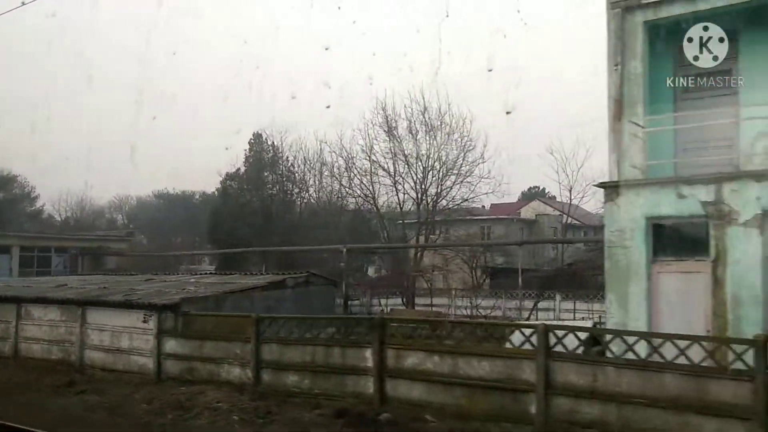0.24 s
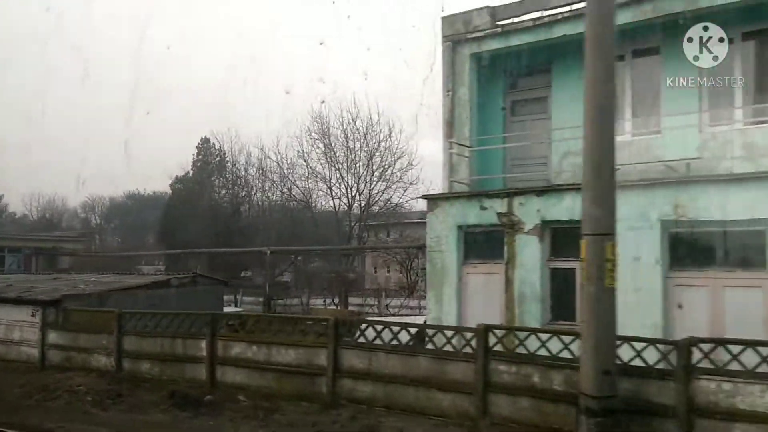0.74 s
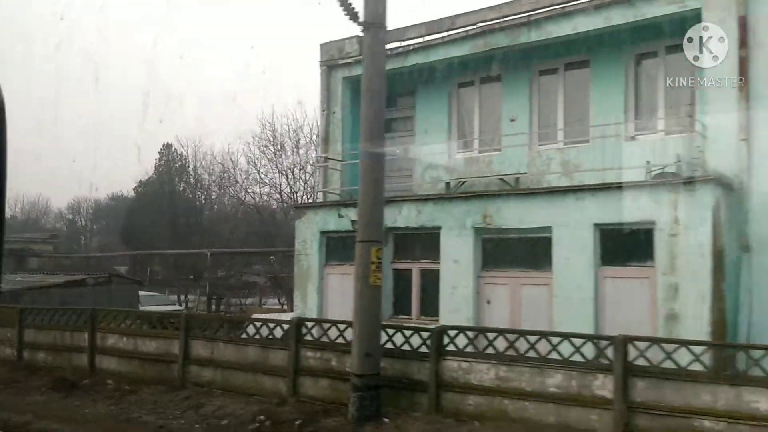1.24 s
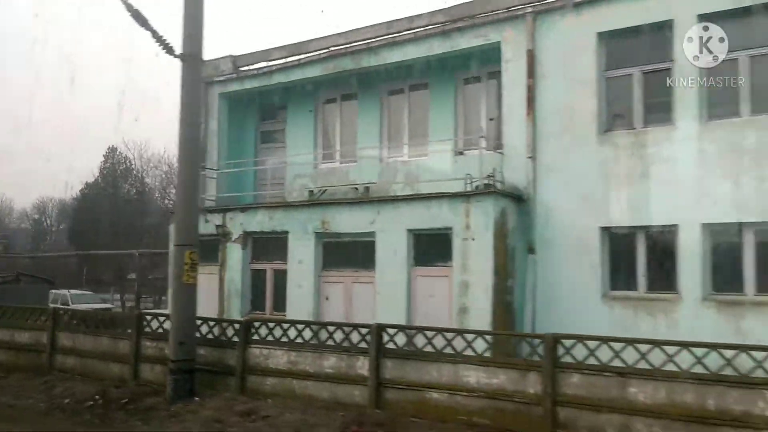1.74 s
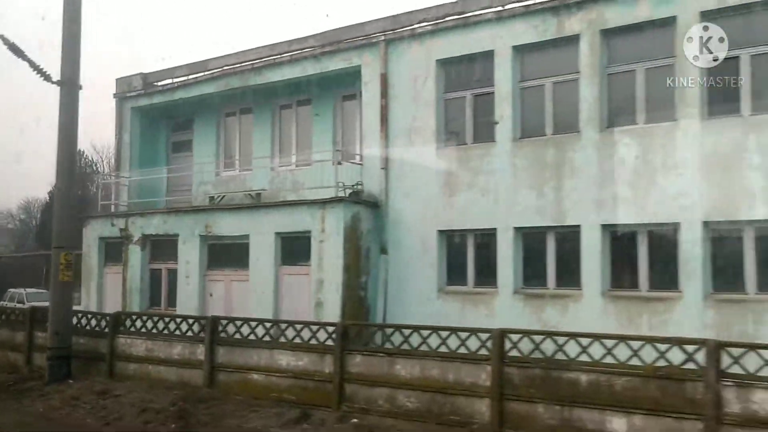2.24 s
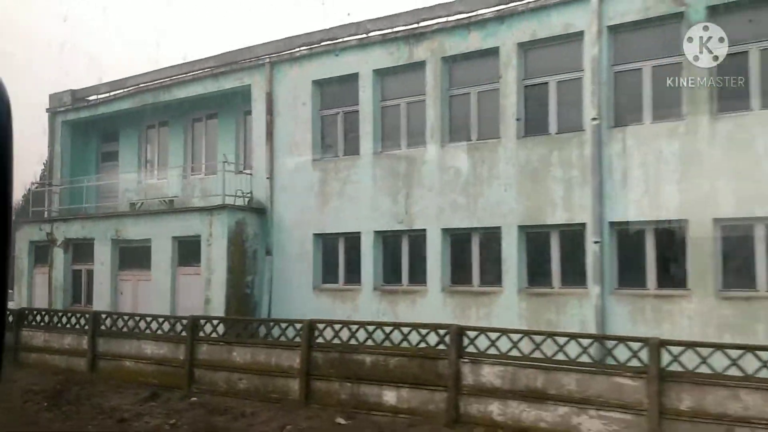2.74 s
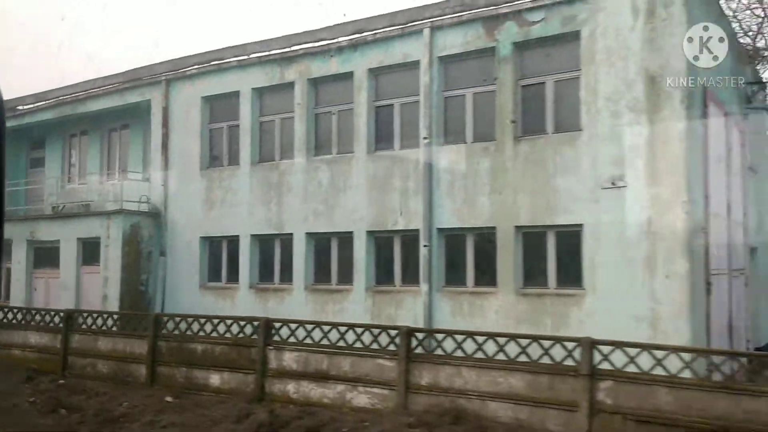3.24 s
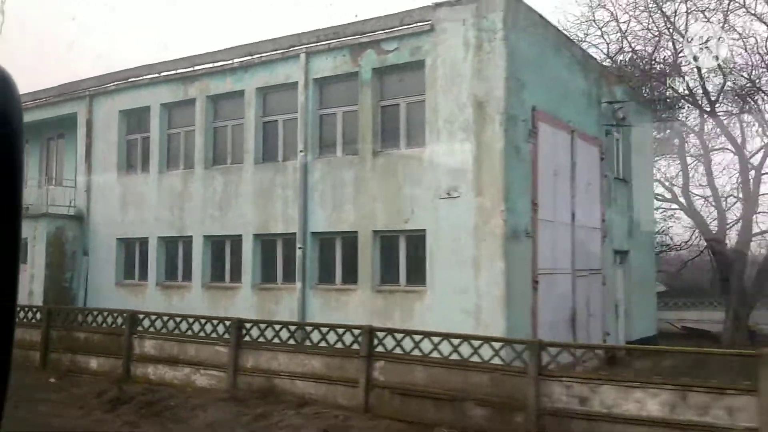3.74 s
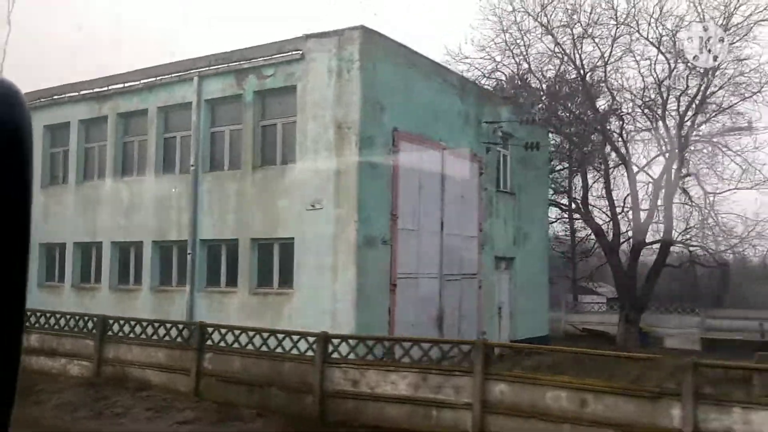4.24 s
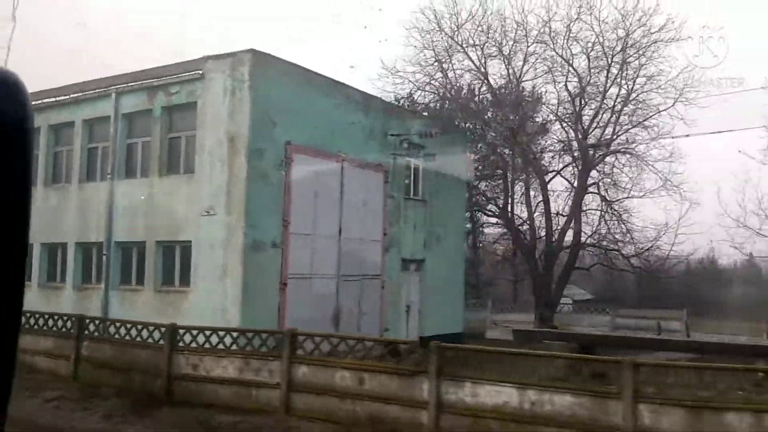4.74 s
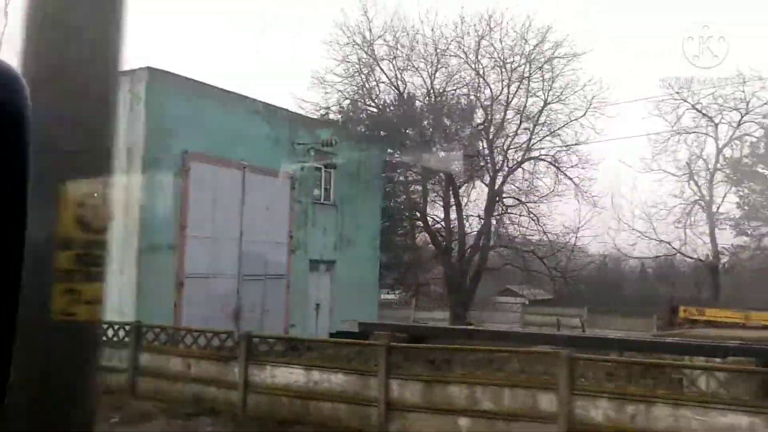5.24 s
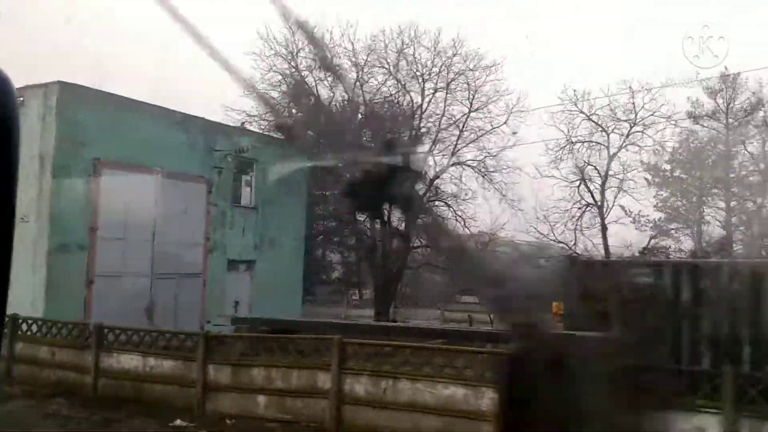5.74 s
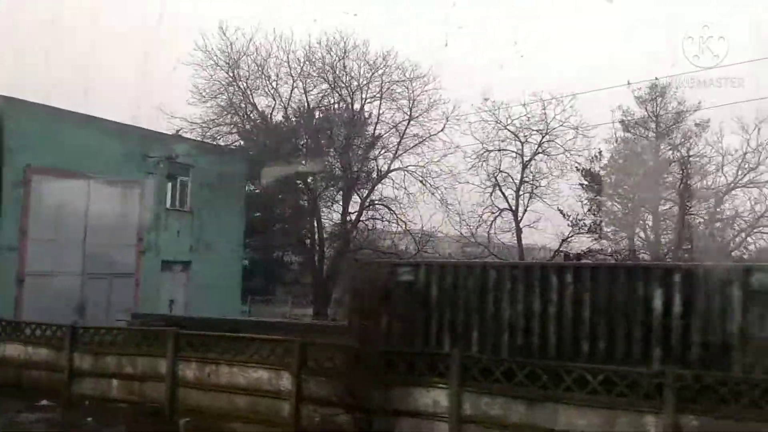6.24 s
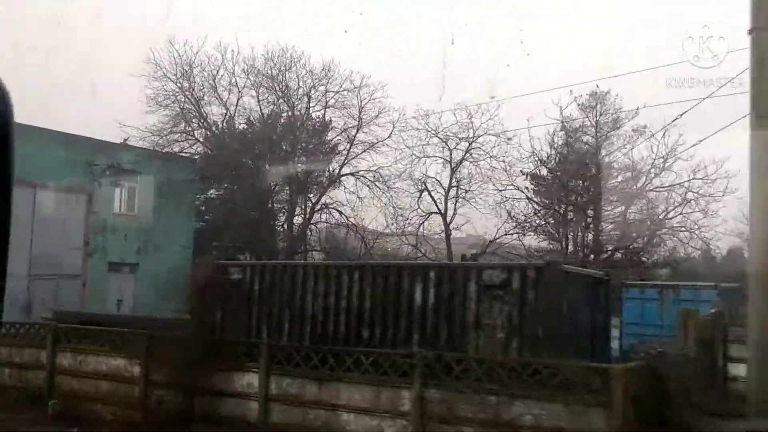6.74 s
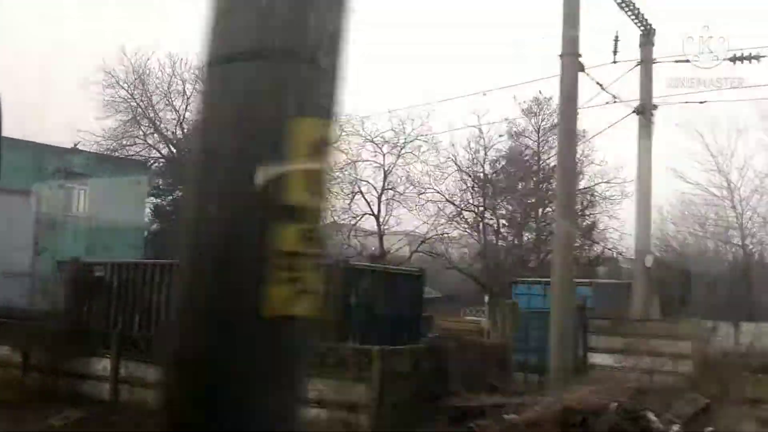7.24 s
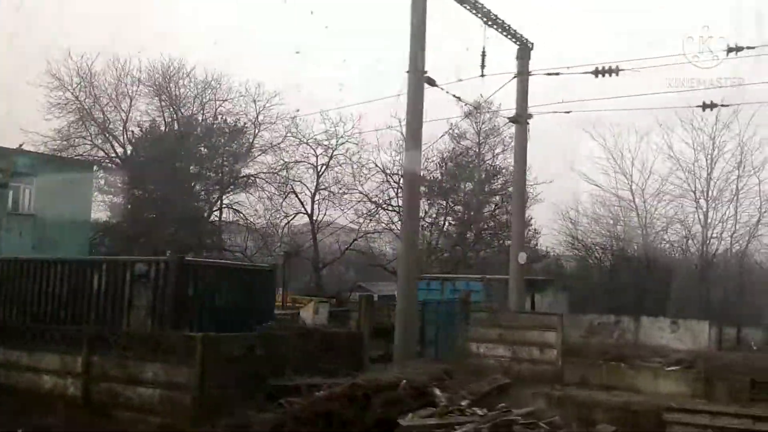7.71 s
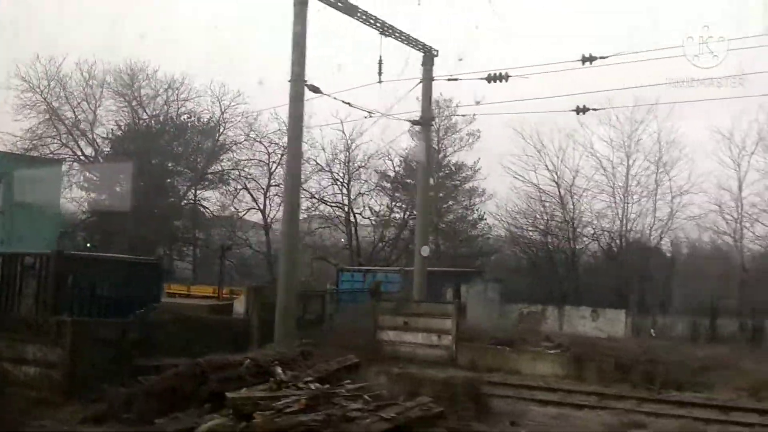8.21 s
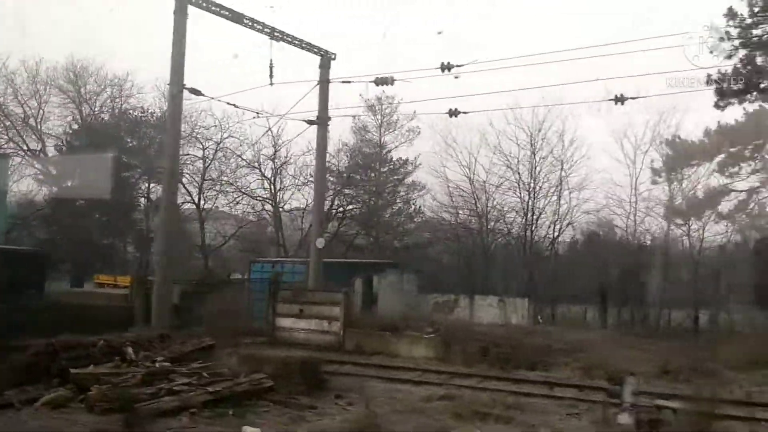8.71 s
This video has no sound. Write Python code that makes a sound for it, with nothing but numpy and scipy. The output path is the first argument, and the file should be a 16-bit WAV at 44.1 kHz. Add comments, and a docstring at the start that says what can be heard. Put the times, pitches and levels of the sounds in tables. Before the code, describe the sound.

Heard from inside a slow passenger carriage, with a phone by the window, a deep wheel rumble runs throughout about nine seconds, dark and muffled, with a swelling floor boom and little top hiss. Irregular rail-joint knocks begin at 0.2 s, with soft thumps at 0.6 and 1.6 s. Firmer blows at 2.4 and 2.8 s ring the floor and panels, and tiny high trim squeaks chirp nearby. A soft rustle passes at 3.3 s. Around 3.9-4.4 s knocks cluster, with a sharp loose-metal clank at 4.24 s. Lighter bumps follow until stronger thuds at 6.6, 7.0 and 7.8 s; a small tick falls at 7.1 s. From 8.2 s blows crowd together over points, with a faint clank at 8.5 s, a bright squeak and a rough gliding squeal from 8.6 to 8.8 s. The rumble continues to the end. Electric whines are barely audible.

```python
"""Wheels of a slow passenger carriage, heard from inside: their roughness, as shaped noise, shakes the floor,
which booms and rumbles, and each rail joint drives the noise harder and rings a panel. Pitched thumps are narrow
noise; trim squeaks, rustles and a clanking fitting are noise bursts and rings; thin electric whines are sines.
Gliding tones squeal over the points at the end. A phone by the window hears it through two ports a hand apart."""
import sys
import numpy as np
from scipy import signal
from scipy.fft import rfft, irfft, next_fast_len
from scipy.io import wavfile
from scipy.ndimage import uniform_filter1d

SR = 44100
rng = np.random.default_rng(int(sys.argv[2]) if len(sys.argv) > 2 else 0)


def generate_wav(sig):
    """Save sig (samples, or channels by samples) to the path in sys.argv[1] as 16-bit PCM at SR."""
    pcm = np.round(np.clip(np.atleast_2d(sig).T, -1, 1) * 32767).astype(np.int16)
    wavfile.write(sys.argv[1], SR, pcm)


N = 395577
TIME = np.arange(N) / SR
MARGIN = 2048  # samples of run-in and run-out for the port filters
SIZE = next_fast_len(N + 2 * MARGIN)
HZ = np.arange(SIZE // 2 + 1) * SR / SIZE + 1e-3  # kept off zero for logs and divisions


def undb(db):
    """dB to gain."""
    return 10 ** (np.asarray(db) / 20)


def over_hz(table, count=1):
    """One column of a spectrum table, read at every frequency along a log axis."""
    columns = np.transpose(table)
    return np.interp(np.log(HZ), np.log(columns[0]), columns[count])


def resonance(hz, width):
    """Gain of one resonance, 1 at its centre."""
    return 1 / np.sqrt(1 + ((HZ - hz ** 2 / HZ) / width) ** 2)


def noise(gain, even=0.):
    """Two unrelated noises of the given colour, rms 1; even > 0 irons out their chance swells."""
    spectrum = rfft(rng.standard_normal((2, SIZE))) * gain
    x = irfft(spectrum, SIZE)
    if even:
        envelope = np.hypot(x, irfft(-1j * spectrum, SIZE))
        x = x / (envelope + 0.072 * x.std()) ** even
    return x[:, :N] / x.std()


def walk(rate):
    """Random levels held 1 / rate s and slewed twice; spread near 1."""
    hold = int(SR / rate)
    steps = np.repeat(rng.standard_normal(N // hold + 1), hold)
    return 1.5 * uniform_filter1d(uniform_filter1d(steps, hold), hold)[:N]


def blow(start_s, rise_s, t60_s):
    """Envelope that swells for rise_s and then dies away, cut one second after its start."""
    envelope, start = np.zeros(N), int(start_s * SR)
    t = TIME[start:start + SR] - TIME[start]
    rise_s = max(rise_s, 1e-3)
    swell = np.sin(np.pi / 2 * np.minimum(t / rise_s, 1)) ** 2
    envelope[start:start + SR] = swell * 1000. ** (-np.maximum(t - rise_s, 0) / t60_s)
    return envelope


def slow(width, even):
    """A pair of noises mostly below width Hz."""
    return noise(resonance(width / 20, width) ** 2, even)


def moved(slip, turn):
    """A pair of slow noises carried up to the pitch whose running phase is turn."""
    return slip[0] * np.cos(turn) + slip[1] * np.sin(turn)


def rings(rows, width, even):
    """Narrow noise moved to the pitch of each (start_s, level_db, pitch_hz, rise_s, t60_s), shaped as a blow."""
    slip, out = slow(width, even), np.zeros(N)
    for start_s, level_db, pitch_hz, rise_s, t60_s in rows:
        at = slice(int(start_s * SR), int(start_s * SR) + SR)
        tone = moved(slip[:, at], 2 * np.pi * pitch_hz * TIME[at])
        out[at] += undb(level_db) * blow(start_s, rise_s, t60_s)[at] * tone
    return out


def bursts(events, colour):
    """Rough contact heard through a few resonances."""
    envelope = sum(undb(level_db) * blow(start_s, rise_s, t60_s) for start_s, level_db, rise_s, t60_s in events)
    gain = sum(undb(gain_db) * resonance(hz, width) ** 2 / np.sqrt(width) for hz, width, gain_db in colour)
    return envelope * noise(gain)


# Levels below are relative ones; scene() sets the mix.
# edges of the nine bands in which the carriage moves on its own: edge_hz
BAND_EDGES = [20, 82, 117, 250, 600, 1300, 2300, 4400, 7200, 20000]
# colour of floor and walls: hz, gain_db (per Hz)
SHELL_COLOUR = [(25, -31.5), (42, -10.5), (55, 1), (76, -8.5), (115, -1.5), (160, 1), (230, -7.5),
                (370, -17), (560, -18), (760, -25.5), (1250, -34), (1650, -33.5), (3700, -43.5),
                (7200, -68), (9300, -72.5), (15000, -72)]
# panel resonances above the shell: hz, width_hz (before sharpening), gain_db
PANEL_RESONANCES = [(96.36, 11, 9), (198, 3.8, 1.5), (296, 15, 5), (309, 18.5, 5), (423.7, 23, 6),
                    (581.4, 13, 6), (668, 4.6, 7.5), (1032.7, 22, 8.5), (1250, 25, 8), (3780, 7.2, 8)]
# low body motion: time_s, sway_db, rumble_db
BODY_MOTION = [(0.0, -35, -36.5), (0.1, -44, -40), (0.37, -35, -34.5), (0.4, -43.5, -36),
               (0.52, -40, -36.5), (2.37, -45, -36), (2.47, -38, -32.5), (2.77, -46.5, -36),
               (2.95, -32.5, -38.5), (3.0, -48.5, -37.5), (3.05, -36.5, -35), (3.35, -43, -35.5),
               (4.1, -36, -38), (4.22, -48, -35), (4.27, -33, -36.5), (4.42, -44.5, -33.5),
               (5.9, -39, -34.5), (5.92, -52.5, -34), (6.05, -39, -39.5), (6.54, -41.5, -35),
               (6.59, -35.5, -33.5), (7.74, -44.5, -37), (7.79, -35.5, -34.5), (8.19, -48.5, -36),
               (8.25, -36, -36.5), (8.37, -51.5, -36), (8.52, -29, -33), (8.57, -41.5, -37),
               (8.89, -37, -36.5), (8.97, -49, -36)]
# surges of the floor boom: time_s, level_db
FLOOR_BOOM = [(0.0, -43), (0.32, -38), (0.4, -44.5), (0.62, -35.5), (0.67, -50), (1.0, -36.5), (1.05, -50),
              (1.1, -41.5), (1.32, -55), (1.6, -33), (1.82, -55), (1.92, -27), (2.02, -43), (2.22, -39),
              (2.32, -55), (2.4, -32), (2.72, -42), (3.0, -28), (3.12, -36.5), (3.45, -33), (3.47, -46),
              (3.52, -26), (3.75, -34), (3.8, -30), (4.45, -36), (5.15, -31.5), (5.22, -45), (5.37, -32),
              (5.72, -36.5), (6.49, -37), (6.52, -48.5), (6.62, -35), (6.75, -44), (6.871, -30),
              (6.92, -52), (6.97, -33.5), (7.99, -33.5), (8.02, -43.5), (8.27, -26.5), (8.34, -43.5),
              (8.47, -31), (8.64, -38.5), (8.67, -30.5), (8.97, -40.5)]
# steady rolling: time_s, level_db
ROLLING = [(0.0, -40), (0.45, -40.5), (1.07, -40.5), (2.75, -39.5), (3.17, -39), (3.8, -38.5), (3.97, -41),
           (4.19, -38.5), (4.35, -39), (4.57, -38.5), (4.92, -38.5), (5.5, -40), (6.97, -39), (7.45, -39.5),
           (8.27, -39), (8.49, -40), (8.64, -34.5), (8.97, -40.5)]
# top hiss: time_s, level_db
TOP_HISS = [(0.0, -82), (0.42, -79.5), (0.97, -84), (1.92, -80), (2.4, -80.5), (3.42, -79.5), (4.12, -80),
            (5.25, -83.5), (6.67, -81), (8.47, -80.5), (8.69, -74.5), (8.97, -82)]
# wheels over joints and rough spots, before the rail's lead:
# start_s, thud_db, knock_db, clack_db, rattle_db, ring_hz, t60_s (of all but the thud)
RAIL_JOINTS = [(0.201, -37, -38, -47, -54.5, 464, 0.71), (0.599, -40.5, -37, -52.5, -58, 514, 0.24),
               (0.708, -42, -54, -51, -62, 500, .15), (1.212, -49, -54, -47.5, -69, 593, 0.13),
               (1.38, -52, -38.5, -60.5, -65, 592, 0.089), (1.644, -37.5, -35.5, -45, -57, 435, 0.49),
               (1.91, -38.5, -43.5, -55.5, -59, 549, 0.35), (2.19, -33.5, -50.5, -59, -57, 446, 0.12),
               (2.425, -36.5, -31.5, -47, -53.5, 310.3, 0.65), (2.82, -28, -33.5, -50.5, -55, 423, 0.38),
               (2.848, -33, -36.5, -46.5, -59.5, 299, 0.35), (3.544, -30, -38.5, -55.5, -62.5, 580, 0.35),
               (3.791, -52, -41, -53, -66.5, 600, 0.12), (3.947, -37.5, -35, -41, -52.5, 586, 0.35),
               (4.208, -42.5, -35, -43.5, -65, 412, 0.28), (4.333, -31.5, -34, -45, -56, 547, 0.53),
               (4.355, -39, -36.5, -41, -59, 700, 0.25), (4.737, -38.5, -35, -44, -56, 406, 0.46),
               (5.464, -50, -46, -49, -60.5, 560, 0.17), (5.581, -36.5, -48, -55.5, -68, 425, 0.24),
               (5.828, -35.5, -42.5, -41, -60.5, 436, 0.21), (6.071, -40.5, -39, -48.5, -68, 518, 0.52),
               (6.583, -32.5, -34.5, -41.5, -49.5, 425, 0.41), (6.975, -27, -37, -52.5, -55.5, 436, 0.78),
               (7.66, -44, -44, -43, -55.5, 421, 0.28), (7.798, -26.5, -38, -50, -59, 390, 0.7),
               (8.24, -29.5, -37, -48, -62, 492, 0.5), (8.345, -44, -39, -52.5, -62.5, 300, .15),
               (8.425, -31, -36.5, -43.5, -49.5, 450, 0.84), (8.492, -30, -32.5, -39, -49, 447, 0.41),
               (8.552, -38.5, -30.5, -42.5, -56.5, 310.6, 0.16), (8.611, -24.5, -39, -40, -53.5, 573, 0.21),
               (8.824, -29.5, -35.5, -47, -55, 428.5, 0.67), (8.902, -39, -37, -48, -64, 400, 0.25)]
JOINT_LEAD_S, JOINT_RISE_S, THUD_RISE_S, THUD_T60_S = 0.015, 0.026, 0.042, 0.24
JOINT_HISS_DB, JOINT_FIZZ_DB = -7, -19  # the two bands above the rattle follow it
RING_DB, RING_WIDTH_HZ = -8.5, 41  # level against the knock
SURGE_DB, SURGE_PER_S = 1.5, 5.5  # the rumble swells by chance
PEAK_HZ, PEAK_WANDER_HZ, PEAK_WANDER_PER_S = 148.4, 18, 8
PEAK_DB, PEAK_WIDTH_HZ = -5.5, 10.1  # level against the rumble


def carriage():
    """Wheel roughness through shell and panels; joints drive the same bands harder and ring a panel."""
    panels = sum((undb(db) ** 2 - 1) * resonance(hz, width) ** 4 for hz, width, db in PANEL_RESONANCES)
    shell = undb(over_hz(SHELL_COLOUR)) * np.sqrt(1 + panels)
    masks = [1 / np.sqrt((1 + (low / HZ) ** 16) * (1 + (HZ / high) ** 16))
             for low, high in zip(BAND_EDGES, BAND_EDGES[1:])]
    body_s, sway_db, rumble_db = np.transpose(BODY_MOTION)
    boom, roll, hiss = (np.transpose(table) for table in (FLOOR_BOOM, ROLLING, TOP_HISS))
    start_s, thud_db, knock_db, clack_db, rattle_db, ring_hz, t60_s = np.transpose(RAIL_JOINTS)
    start_s = start_s - JOINT_LEAD_S  # the rail carries the blow ahead of the wheel

    # sway, boom and rumble; thuds add their power to the rumble
    thud_shapes = np.array([blow(s, THUD_RISE_S, THUD_T60_S) for s in start_s]) ** 2
    thuds = undb(thud_db) ** 2 @ thud_shapes
    surging_db = np.interp(TIME, body_s, rumble_db) + SURGE_DB * walk(SURGE_PER_S)
    rumble = np.sqrt(undb(surging_db) ** 2 + thuds)
    out = undb(np.interp(TIME, body_s, sway_db)) * noise(shell * masks[0], 0.12)
    out = out + undb(np.interp(TIME, *boom)) * noise(shell * masks[1], 0.37)
    out = out + rumble * noise(shell * masks[2], 0.35)

    # one loose resonance of the floor drifts about inside the rumble
    pitch = PEAK_HZ + PEAK_WANDER_HZ * walk(PEAK_WANDER_PER_S)
    turn, slip = 2 * np.pi * np.cumsum(pitch) / SR, slow(PEAK_WIDTH_HZ, 0.96)
    # the second channel gets the same noise reversed in time
    out = out + rumble * undb(PEAK_DB) * [moved(slip, turn), moved(slip[:, ::-1], turn)]

    # five bands share the rolling; joints add power to each
    joint_shapes = np.array([blow(s, JOINT_RISE_S, fade) for s, fade in zip(start_s, t60_s)]) ** 2
    whole = np.sum(sum(masks[3:8]) ** 2 * shell ** 2)
    rolling, tremble, grain = undb(np.interp(TIME, *roll)), walk(7), walk(60)
    joint_dbs = knock_db, clack_db, rattle_db, rattle_db + JOINT_HISS_DB, rattle_db + JOINT_FIZZ_DB
    for mask, joint_db in zip(masks[3:8], joint_dbs):
        share = np.sum((shell * mask) ** 2) / whole
        flicker_db = 0.42 * tremble + 0.75 * walk(14) + 0.5 * grain
        steady = share * (rolling * undb(flicker_db)) ** 2
        out = out + np.sqrt(steady + undb(joint_db) ** 2 @ joint_shapes) * noise(shell * mask)

    panel_rings = [(s, db + RING_DB, hz, JOINT_RISE_S, fade)
                   for s, db, hz, fade in zip(start_s, knock_db, ring_hz, t60_s)]
    out = out + rings(panel_rings, RING_WIDTH_HZ, 1.0)
    return out + undb(np.interp(TIME, *hiss) + 1.8 * walk(15)) * noise(shell * masks[-1])


# faint electric whines: pitch_hz, left_db, right_db, end_s
ELECTRIC_WHINES = [(14000, -90, -99, 2.3), (11910, -98, -97, 9)]


def whines():
    """Thin steady sines at the edge of hearing, each faded over the last 0.1 s before its end."""
    return sum(undb([[left_db], [right_db]]) * np.sin(2 * np.pi * hz * TIME) * np.clip((end_s - TIME) * 10, 0, 1)
               for hz, left_db, right_db, end_s in ELECTRIC_WHINES)


# trim squeaks, before a 4 ms lead: start_s, level_db (left), pitch_hz
TRIM_SQUEAKS = [(0.379, -63, 7740), (1.2236, -75, 7740), (2.4349, -61, 8280), (2.469, -60, 10450),
                (2.5968, -72, 10500), (2.8644, -67, 10410), (3.0021, -67, 10700), (3.7474, -63.5, 10400),
                (4.1466, -67, 10380), (5.6471, -70, 7986), (5.686, -72, 10400), (6.6937, -67.5, 10360),
                (7.301, -62.5, 7680), (7.4834, -71, 10480), (8.6144, -55.5, 8100), (8.8029, -69, 10300)]
SQUEAK_RISE_S, SQUEAK_T60_S, SQUEAK_WIDTH_HZ, SQUEAK_RIGHT_DB = 0.01, 0.14, 120, -11


def squeaks():
    """Short stick-slip chirps of the trim near the left port, made of narrow noise."""
    rows = [(start_s - .004, db, hz, SQUEAK_RISE_S, SQUEAK_T60_S) for start_s, db, hz in TRIM_SQUEAKS]
    return rings(rows, SQUEAK_WIDTH_HZ, .3) * undb([[0], [SQUEAK_RIGHT_DB]])


# compact blows that ring floor and walls at one pitch: start_s, level_db (rms at the top), pitch_hz, rise_s, t60_s
FLOOR_THUMPS = [(0.599, -35, 300, 0.0091, 0.095), (1.644, -36.5, 426, 0.013, 0.074),
                (2.428, -31, 285.0, 0.013, 0.062), (2.462, -34.5, 311, 0.011, 0.062),
                (2.498, -38.8, 308, 0.01, 0.048), (2.816, -38, 423, 0.01, 0.15),
                (2.818, -30.5, 186.4, 0.012, 0.22), (2.822, -40.5, 267, 0.039, 0.05),
                (2.848, -25, 130, 0.011, 0.036), (3.839, -30.5, 85.6, 0.031, 0.07),
                (3.947, -37, 600, 0.006, 0.06), (3.973, -30.5, 97.3, 0.014, 0.09),
                (4.129, -29.5, 123.4, 0.008, 0.056), (4.352, -37.0, 282, 0.012, 0.05),
                (4.365, -35.5, 607, 0.01, 0.087), (4.558, -30, 140.5, 0.01, 0.057),
                (4.727, -34.5, 221.0, 0.0087, 0.083), (5.717, -33.5, 135.4, 0.054, 0.11),
                (6.579, -27.5, 154.7, 0.012, 0.082), (6.749, -33, 149.8, 0.01, 0.054),
                (6.974, -32, 146, 0.017, 0.028), (7.018, -25, 138.6, 0.0089, 0.19),
                (7.8, -37.1, 292, 0.022, 0.13), (7.808, -23.6, 138.6, 0.016, 0.1),
                (7.83, -36.4, 231.0, 0.012, 0.31), (8.213, -24.5, 145.0, 0.02, 0.054),
                (8.229, -35, 169.7, 0.063, 0.05), (8.413, -34, 167.5, 0.016, 0.076),
                (8.459, -26, 113.5, 0.016, 0.058), (8.493, -31.5, 297.2, 0.026, 0.065),
                (8.505, -30.5, 81.0, 0.008, 0.23), (8.517, -43.5, 579, 0.0062, 0.13),
                (8.521, -32.5, 233.2, 0.008, 0.2), (8.551, -35, 312.0, 0.008, 0.1),
                (8.62, -27, 167.0, 0.01, 0.084), (8.628, -41.5, 312.0, 0.015, 0.07),
                (8.652, -31.5, 95, 0.019, 0.083), (8.656, -35, 223, 0.01, 0.14),
                (8.75, -37.5, 248.0, 0.018, 0.2), (8.814, -27, 178.0, 0.022, 0.07),
                (8.835, -29.5, 105, 0.011, 0.07)]
THUMP_WIDTH_HZ, THUMP_RIGHT_DB = 8, -6


def thumps():
    """Blows through the floor reach both ports in step, weaker on the right."""
    return rings(FLOOR_THUMPS, THUMP_WIDTH_HZ, 0.99) * undb([[0], [THUMP_RIGHT_DB]])


# rustles and ticks: start_s, level_db, rise_s, t60_s
RUSTLE_EVENTS = [(2.22, -65, 0.018, 0.23), (2.9, -68, 0.047, 0.31), (3.315, -61, 0.015, 0.48),
                 (4.37, -66.5, 0.034, 0.18), (7.108, -57.5, .003, 0.048), (8.47, -65, 0.017, 0.25),
                 (8.605, -64, 0.0082, .5)]
# their colour: hz, width_hz (before squaring), gain_db (before scaling by width)
RUSTLE_RESONANCES = [(3000, 2700, 12), (6000, 1400, -9.5), (11000, 8000, -7)]


def rustles():
    """Something rustles or ticks close by: bursts of noise through broad resonances."""
    return bursts(RUSTLE_EVENTS, RUSTLE_RESONANCES)


# blows on the loose fitting: start_s, strength_db
FITTING_BLOWS = [(4.2415, 0), (4.262, -11), (8.512, -14)]
# crack of each blow: level_db (at strength 0), rise_s, t60_s
CRACK = (-41, 0.003, 0.09)
# colour of the crack: hz, width_hz (before squaring), gain_db (before scaling by width)
CRACK_COLOUR = [(1000, 500, -4.5), (1650, 500, -0.5), (2300, 220, 9), (2820, 570, -10), (4000, 500, -18.5)]
# modes that ring on: pitch_hz, level_db (at strength 0), t60_s
FITTING_MODES = [(620, -42, .12), (860, -44, .16), (1030, -42, .16), (1180, -46, .16), (1384, -47, .2),
                 (1540, -39, .07), (1620, -44, .17), (1750, -50, .2), (2525, -57, .12), (2783, -51, .12),
                 (3031, -50, .09), (3499, -56, .05), (3950, -58, .04)]


def clank():
    """A crack of rough contact at each blow, while the fitting rings in its own modes."""
    crack_db, rise_s, fade_s = CRACK
    cracks = [(start_s, db + crack_db, rise_s, fade_s) for start_s, db in FITTING_BLOWS]
    modes = [(start_s, db + mode_db, hz, rise_s, t60_s)
             for start_s, db in FITTING_BLOWS for hz, mode_db, t60_s in FITTING_MODES]
    return bursts(cracks, CRACK_COLOUR) + rings(modes, 30, .95)


# partials of a rough gliding squeal: start_s, end_s, first_hz, middle_hz, last_hz, level_db
SQUEAL_PARTIALS = [(8.585, 8.655, 3530, 3530, 3520, -60), (8.6, 8.635, 1625, 1625, 1610, -50),
                   (8.61, 8.705, 900, 930, 1030, -47), (8.61, 8.705, 1850, 1890, 2050, -54),
                   (8.65, 8.705, 2850, 2860, 2870, -57), (8.665, 8.795, 3030, 3110, 3050, -64),
                   (8.69, 8.74, 1030, 1120, 1160, -50), (8.68, 8.805, 1700, 1950, 1700, -50.5),
                   (8.795, 8.84, 1680, 1700, 1690, -53), (8.595, 8.665, 2410, 2405, 2400, -57),
                   (8.705, 8.79, 2450, 2420, 2400, -58), (8.665, 8.82, 5120, 5420, 5200, -75),
                   (8.69, 8.8, 5230, 5330, 5380, -76), (8.68, 8.82, 10500, 11050, 10700, -88),
                   (8.6, 8.64, 780, 860, 900, -48), (8.6, 8.665, 5860, 5880, 5900, -80),
                   (8.605, 8.675, 6450, 6450, 6410, -78), (8.605, 8.645, 5260, 5270, 5290, -78)]
SQUEAL_TREMBLE = .006  # share of the pitch
CHATTER_HZ, CHATTER_DEPTH = 105, .45  # the contact chatters and splits each partial


def squeals():
    """Stick-slip tones over the points, whose pitch arches, trembles and breaks up."""
    out = np.zeros(N)
    for start_s, end_s, *hz, level_db in SQUEAL_PARTIALS:
        at = slice(int(start_s * SR), int(end_s * SR))
        part = np.linspace(0, 1, at.stop - at.start)
        arch = np.polyval(np.polyfit([0, .5, 1], hz, 2), part)
        pitch = arch * (1 + SQUEAL_TREMBLE * walk(500)[at])
        chatter = 1 + CHATTER_DEPTH * np.cos(2 * np.pi * CHATTER_HZ * TIME[at])
        patchy = undb(level_db + 2.2 * walk(50)[at]) * chatter
        out[at] += patchy * np.sqrt(np.sin(np.pi * part)) * np.sin(2 * np.pi * np.cumsum(pitch) / SR)
    return out


# how the cabin makes the ports agree below CABIN_HZ: hz, shared_part (0-1), left_lead_rad
CABIN_LIKENESS = [(60, 1, .2), (90, .83, 0.29), (135, 0.6, 1.3), (190, .66, 0.31), (273, 0.45, 2.44),
                  (366, 0, 4.7), (455, 1, 5.23), (686, 0.63, 6.05), (1040, 1, 6.25)]
# how alike the ports are above it: hz, shared_part (0-1)
PORT_LIKENESS = [(1100, 1), (3500, 1), (5500, 0.6), (9000, 0.2), (15000, 0.01)]
# balance of the ports: hz, left_minus_right_db
PORT_BALANCE = [(50, 4), (100, 7), (200, 7), (290, 3.5), (400, 7.5), (600, 8), (720, 1), (1200, 2.5),
                (1600, 1), (2200, 3.5), (4500, 3), (9000, 5), (15000, 2)]
PORT_LAG_S, AHEAD_SHARE, CABIN_HZ = 0.0004482, 0.88, 1055


def ports(pair):
    """Above CABIN_HZ, sound from ahead meets the left port first, from behind last; the right is of opposite sign."""
    lag = np.exp(-2j * np.pi * HZ * PORT_LAG_S)
    low = over_hz(CABIN_LIKENESS) * np.exp(-1j * over_hz(CABIN_LIKENESS, count=2))
    high = -over_hz(PORT_LIKENESS) * (AHEAD_SHARE * lag + (1 - AHEAD_SHARE) / lag)
    shared = np.where(HZ < CABIN_HZ, low, high)
    left, other = rfft(np.pad(pair, [(0, 0), (MARGIN, MARGIN)], mode="reflect"), SIZE)
    right = shared * left + np.sqrt(np.clip(1 - abs(shared) ** 2, 0, 1)) * other
    return irfft([left, right * undb(-over_hz(PORT_BALANCE))], SIZE)[:, MARGIN:MARGIN + N]


def scene():
    """Everything in the carriage as the two ports hear it; squeaks and whines skip the 3.5 dB lift."""
    room = carriage() + clank() + rustles() + squeals()
    return undb(3.5) * (ports(room) + thumps()) + squeaks() + whines()


LOW_CUT_HZ, TOP_HZ = 44.8, 15450


def record(dry):
    """The phone cuts the deepest bass and the top."""
    heard = signal.sosfilt(signal.butter(4, LOW_CUT_HZ, "high", fs=SR, output="sos"), dry)
    return signal.sosfilt(signal.ellip(8, .2, 70, TOP_HZ, fs=SR, output="sos"), heard)


dry = scene()
out = record(dry)
generate_wav(out)
```